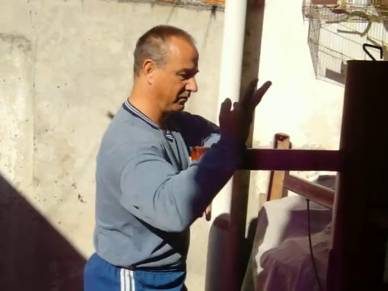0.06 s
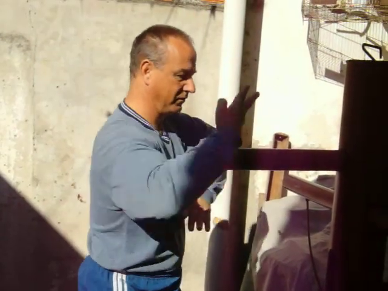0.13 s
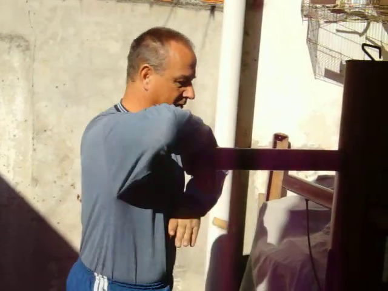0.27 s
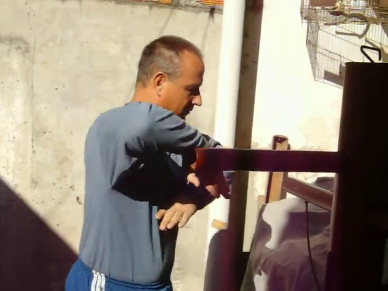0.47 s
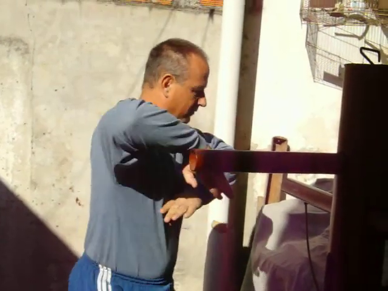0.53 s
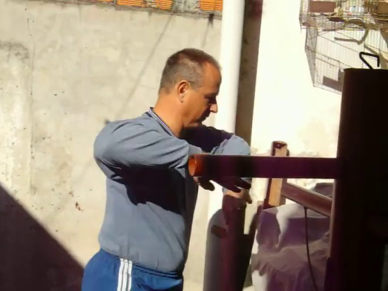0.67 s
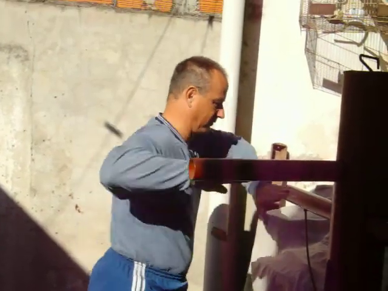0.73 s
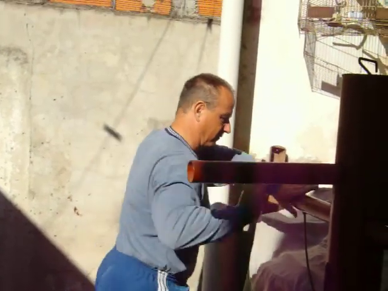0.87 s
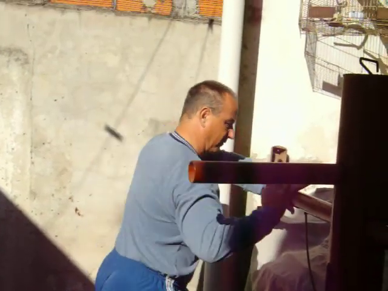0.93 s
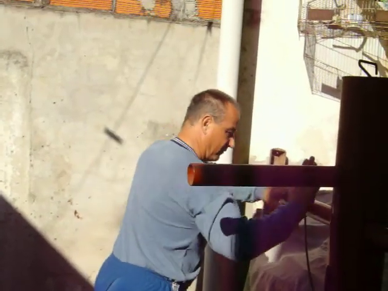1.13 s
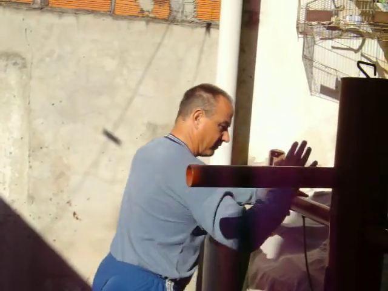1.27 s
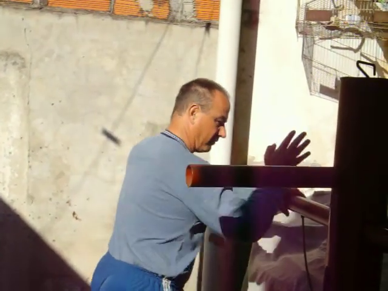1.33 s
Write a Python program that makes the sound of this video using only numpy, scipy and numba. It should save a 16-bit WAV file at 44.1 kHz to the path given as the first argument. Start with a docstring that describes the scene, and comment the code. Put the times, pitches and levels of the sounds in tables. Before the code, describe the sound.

Forearms strike a wooden training dummy in a yard with a short echo. After a light tap at the start, a loud clatter of quick knocks comes at about 0.25 seconds. Hollow bumps near 0.7 lead into a second loud clatter at 0.8. Softer knocks follow from 1.0 to 1.3 seconds. Faint sleeve swishes, shuffling and low outdoor noise sit underneath.

```python
"""Forearms on a wooden training dummy

Each blow makes a loose wooden arm clatter in its slot: a few quick knocks excite the modes of arm
and trunk, while softer pushes sound hollow. Sleeves swish ahead of the blows and the body shuffles.
The walls of the yard reverberate over low outdoor noise and puffs of air on the microphone.
A gain control ducks the sound under the blows."""
import sys
import numpy as np
from scipy import signal
from scipy.fft import rfft, irfft
from scipy.io import wavfile
from numba import njit

SR = 44100
rng = np.random.default_rng(int(sys.argv[2]) if len(sys.argv) > 2 else 0)


def digitize_waveform(pressure):
    """Quantize a signal to 16-bit integers and store it at the path in sys.argv[1].

    Rows of a 2-D input are taken as channels; values are limited to [-1, 1].
    """
    field = np.atleast_2d(pressure).T
    bounded = np.clip(field, -1, 1)
    quanta = np.round(bounded * 32767).astype(np.int16)
    wavfile.write(sys.argv[1], SR, quanta)


N = 61739
TOP_HZ = 15800

# modes of the trunk: (frequency [Hz], level [dB], T60 [s])
TRUNK_MODES = [(126.6, -15, 0.3), (175, -6.5, 0.33), (205, 4, 0.13), (266.4, -6, 0.1), (381, -8, 0.15)]


def undb(db):
    """Amplitude ratio of a level in decibels."""
    return 10 ** (np.asarray(db) / 20)


def convolve(x, response):
    """Convolution with an impulse response, cut to the length of x."""
    return signal.fftconvolve(x, response)[:len(x)]


def colour(x, points):
    """Minimum-phase filter through (frequency [Hz], level [dB]), with its power gain below TOP_HZ scaled to a
    fixed total."""
    size = 8192
    hz, db = np.array(points, float).T
    bin_hz = np.arange(size // 2 + 1) * SR / size
    gain = undb(np.interp(np.log(bin_hz + 1), np.log(hz), db))
    gain /= np.sqrt(np.sum(gain[:size * TOP_HZ // SR] ** 2) / len(gain))
    cepstrum = irfft(np.log(gain))
    cepstrum[1:size // 2] *= 2  # folding the cepstrum makes the filter causal
    cepstrum[size // 2 + 1:] = 0
    return convolve(x, irfft(np.exp(rfft(cepstrum))))


def fade(t60):
    """Exponential damping, 60 dB down after t60 seconds."""
    return np.exp(-np.log(1000) * np.arange(N) / SR / t60)


def burst(envelope):
    """White noise under an envelope, normalised to unit energy."""
    return rng.standard_normal(N) * envelope / np.sqrt(np.sum(envelope ** 2))


def walk(rate_hz):
    """Random modulation: linear interpolation between Gaussian values."""
    position = np.arange(N) / SR * rate_hz
    return np.interp(position, np.arange(N), rng.standard_normal(N))


def ring(modes):
    """Free vibration as a sum of damped modes."""
    t = np.arange(N) / SR
    return sum(undb(db) * np.cos(2 * np.pi * hz * t) * fade(t60) for hz, db, t60 in modes)


def swells(movements):
    """Envelope of exponential growth and decay about each movement's peak."""
    t = np.arange(N) / SR
    return sum(undb(db) * np.exp(-np.maximum((peak - t) / rise, (t - peak) / fall))
               for peak, db, rise, fall in movements)


def add(out, sound, start_s):
    """Superpose a sound from its start time."""
    i = int(np.clip(start_s * SR, 0, N - 1))
    out[i:] += sound[:N - i]


def echoes(delay_s=0.006, build_s=0.004):
    """Reverberation: wall reflections arrive late, build up and die away."""
    late = np.maximum(np.arange(N) / SR - delay_s, 0)
    return burst((1 - np.exp(-late / build_s)) * fade(t60=0.51))


def rumble(movements, spectrum):
    """Amplitude modulation: filtered noise swells with each movement."""
    return swells(movements) * colour(rng.standard_normal(N), spectrum)


def friction(movements, spectrum):
    """Sliding friction: grainy noise swells with each movement and reflects off the walls."""
    noise = rng.standard_normal(N) * swells(movements)
    grain = undb(3 * walk(rate_hz=400))
    rub = colour(noise * grain, spectrum)
    return rub + undb(-2) * convolve(rub, echoes())


def background():
    """Ambient noise: low outdoor sound whose level wavers slowly."""
    # outdoor spectrum: (frequency [Hz], relative density [dB])
    spectrum = [(20, -4), (40, -18), (60, 1), (95, -2.5), (190, 1.5), (300, -9.5), (480, -12.5), (780, -8),
                (1400, -15), (2300, -26.5), (3100, -18), (4200, -28.5), (6000, -35)]
    return undb(-34.5 + 3 * walk(rate_hz=3.3)) * colour(rng.standard_normal(N), spectrum)


def air_puffs():
    """Buffeting: moving air makes low pressure fluctuations at the microphone."""
    # puffs: (peak time [s], level [dB], rise [s], fall [s])
    puffs = [(0.17, -26.5, 0.094, 0.041), (0.56, -32.5, 0.029, 0.083), (1.32, -31.5, 0.1, .1)]
    # buffeting spectrum: (frequency [Hz], relative density [dB])
    spectrum = [(20, -7), (38, -7), (60, 0), (95, -14), (200, -34), (6000, -57.5)]
    return rumble(puffs, spectrum)


def shuffling():
    """Movement noise: a dull rumble as the body shifts its weight."""
    # weight shifts: (peak time [s], level [dB], rise [s], fall [s])
    shifts = [(0.04, -34, 0.079, 0.018), (0.18, -33, 0.1, 0.098), (0.39, -34.5, .02, 0.039),
              (1.022, -25, .005, 0.045), (1.09, -29.5, 0.027, 0.13), (1.35, -32, 0.066, 0.127)]
    # shuffling spectrum: (frequency [Hz], relative density [dB])
    spectrum = [(30, -10), (80, -7.5), (180, -3), (260, -2.5), (390, -7), (600, -10.5), (1500, -31),
                (6000, -63.5)]
    return rumble(shifts, spectrum)


def sleeves():
    """Cloth friction: sleeves swish and slap."""
    # sleeve movements: (peak time [s], level [dB], rise [s], fall [s])
    swishes = [(0.197, -36, 0.053, 0.099), (0.198, -34, .002, .003), (0.289, -17.5, 0.011, 0.01),
               (0.624, -33, 0.011, 0.032), (0.631, -41, 0.00091, 0.0027), (0.746, -51.5, 0.023, 0.016),
               (0.790, -14, 0.011, 0.011), (1.027, -28, 0.0065, 0.0083)]
    # cloth spectrum: (frequency [Hz], relative density [dB])
    spectrum = [(200, 1), (900, -0.5), (1700, -9), (2600, 2), (3600, -2), (5000, -5), (6000, -16.5)]
    return friction(swishes, spectrum)


def scrapes():
    """Dry friction: the wooden arm is pushed across its slot."""
    # slides of the arm: (peak time [s], level [dB], rise [s], fall [s])
    slides = [(0.68, -31.5, .015, 0.064), (0.74, -45.5, 0.038, 0.036), (1.30, -41.5, 0.02, 0.016)]
    # scraping spectrum: (frequency [Hz], relative density [dB])
    spectrum = [(300, -21), (700, 7), (1200, -11), (1700, -6.5), (2500, -15.5), (3250, 0.5), (3900, -15.5),
                (6000, -29.5)]
    return friction(slides, spectrum)


def clink():
    """Hard contact excites high modes as the first arm reaches its stop."""
    # modes of the clink: (frequency [Hz], level [dB], T60 [s])
    modes = [(3948, 0, .17), (4005, 5, .035), (4440, -13, .13)]
    out = np.zeros(N)
    add(out, undb(-15.5) * ring(modes), start_s=0.2925)
    return out


def pushes(rise_s=0.0044):
    """Soft contact swells only a low, hollow mode of the arm and the trunk; the yard reverberates."""
    # forearm pushes: (time [s], level [dB], pitch [Hz], trunk gain before halving [dB])
    contacts = [(0.2690, -10.5, 704, -18), (0.6885, -9.5, 647, -18), (0.7130, -12, 670, 2),
                (1.0560, -10.5, 784, -14.5), (1.2931, -15, 665, -18)]
    # yard's response to a push: (frequency [Hz], relative density [dB])
    yard_spectrum = [(100, -32.5), (400, -13.5), (670, 0), (850, -2), (1200, -15), (1750, -15.5),
                     (2400, -27.5), (3200, -28), (6000, -49)]
    out, t, trunk = np.zeros(N), np.arange(N) / SR, ring(TRUNK_MODES)
    build = 1 - np.exp(-t / rise_s)
    for start, db, hz, thump_db in contacts:
        hollow = np.sin(2 * np.pi * hz * t) * fade(t60=0.068)
        thump = undb(thump_db) * trunk / 2
        yard = undb(19.5) * colour(echoes(), yard_spectrum)
        add(out, undb(db) * ((hollow + thump) * build + yard), start)
    return out


def knocks(build_cycles=1.9):
    """Impact excites the modes of one arm and the trunk; softer contact is duller and builds slower."""
    # impacts: (time [s], level [dB], contact corner [Hz], trunk gain [dB], arm [0 or 1])
    impacts = [(0.002, -20.5, 900, -11.5, 1), (0.2410, -6.5, 2284, -1, 0), (0.2470, 2.5, 700, 8, 0),
               (0.2630, -9, 900, -7.5, 0), (0.2695, 2, 1300, 9.5, 0), (0.2765, -7, 1000, -7.5, 0),
               (0.2855, 1.5, 2500, -11, 0), (0.2930, -0.5, 7000, 9, 0), (0.663, -16.5, 1490, 6.5, 1),
               (0.731, -14.5, 597, 11, 1), (0.7820, -13, 6880, 10.5, 1), (0.7925, 0, 2960, -14, 1),
               (0.8015, 6, 1580, -29, 1), (0.8170, -7, 2500, -30.5, 1), (0.835, -7, 2560, -24, 1),
               (0.878, -13.5, 1183, -20.5, 1), (1.0110, -11, 1940, -2.5, 1), (1.0165, -10.5, 1626, -38, 0),
               (1.043, -11.5, 1700, -15, 1), (1.057, -9.5, 1200, -5, 0), (1.105, -18, 2960, 12.5, 1),
               (1.150, -20.5, 1200, 7.5, 1), (1.258, -22, 1980, 14.5, 1)]
    # modes of each arm: (frequency [Hz], level [dB], T60 [s])
    first_arm = [(684, 3, .22), (705, 0, .06), (746, -3, .18), (868, -5, .16), (991, -8, .34),
                 (1057, -6, .27), (1167, -16, .35), (1890, -14, .45), (2562, -18, .2), (2890, -13, .35),
                 (3063, -10, .35), (3270, -6, .12)]
    second_arm = [(560, -10, .15), (655, 1, .18), (790, -8, .32), (870, -9, .2), (1023, -14, .4),
                  (1168, -6, .36), (1600, -8, .4), (1762, -10, .38), (1792, -9, .38), (2900, -14, .4),
                  (3155, -10, .3), (3510, -15, .32)]
    # the wood's dense, quickly damped modes: (frequency [Hz], relative density [dB])
    wood_spectrum = [(100, -35), (420, -17), (680, 0), (1100, -2), (1400, -8.5), (1800, -8), (2350, -17),
                     (2750, -16.5), (3100, -12.5), (3600, -8), (4500, -22), (6000, -34)]
    # yard's response to a knock: (frequency [Hz], relative density [dB])
    yard_spectrum = [(100, -20), (200, -14.5), (420, -9), (680, 1), (1100, -1.5), (1400, -9), (1850, -4.5),
                     (2350, -17.5), (2750, -14), (3100, -1), (3600, -15), (4500, -27), (6000, -22.5)]
    out, trunk = np.zeros(N), ring(TRUNK_MODES)
    arms = [ring(first_arm), ring(second_arm)]
    for start, db, corner_hz, thump_db, arm in impacts:
        crack = undb(17) * colour(burst(fade(t60=0.051)), wood_spectrum)
        yard = undb(17.5) * colour(echoes(), yard_spectrum)
        ringing = undb(-15.5) * arms[arm]
        thump = undb(thump_db - 28.5) * trunk
        build = 1 - np.exp(-np.arange(N) / SR * corner_hz / build_cycles)
        knock = (crack + yard + ringing + thump) * build
        contact_lowpass = signal.butter(1, corner_hz, fs=SR)
        add(out, undb(db) * signal.lfilter(*contact_lowpass, knock), start)
    return out


def scene():
    """Superposition of dummy, body and outdoor air at one microphone."""
    wood = knocks() + pushes() + clink() + scrapes()
    body = sleeves() + shuffling()
    return (wood + body + air_puffs() + background())[None]


@njit
def follow(x, attack_s, release_s):
    """Envelope detection: rectify, then smooth with separate rise and fall times."""
    attack, release = 1 / (1 + attack_s * SR), 1 / (1 + release_s * SR)
    out, level = np.empty(len(x)), 0.
    for i in range(len(x)):
        level += (abs(x[i]) - level) * (attack if abs(x[i]) > level else release)
        out[i] = level
    return out


def record(dry):
    """Compression ducks the blows; saturation rounds the peaks, then band limiting and clipping follow."""
    threshold_db, ratio = -10, 2.15
    soft_ceiling, hard_ceiling, band_hz = 0.69, 0.693, 5650
    level = follow(dry[0], attack_s=0.0049, release_s=0.14)
    gain = np.maximum(level / undb(threshold_db), 1) ** (1 / ratio - 1)
    rounded = soft_ceiling * np.tanh(dry * gain / soft_ceiling)
    narrow = signal.sosfilt(signal.ellip(9, .2, 75, band_hz, fs=SR, output="sos"), rounded)
    clipped = np.clip(narrow, -hard_ceiling, hard_ceiling)
    return signal.sosfilt(signal.ellip(8, .2, 70, TOP_HZ, fs=SR, output="sos"), clipped)


dry = scene()
out = record(dry)
digitize_waveform(out)
```